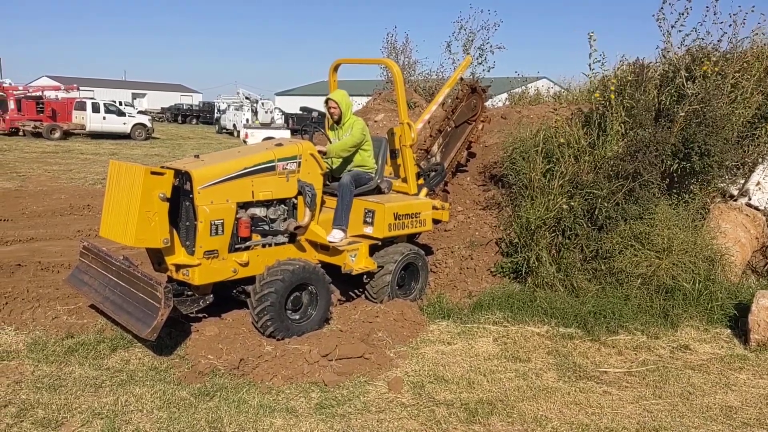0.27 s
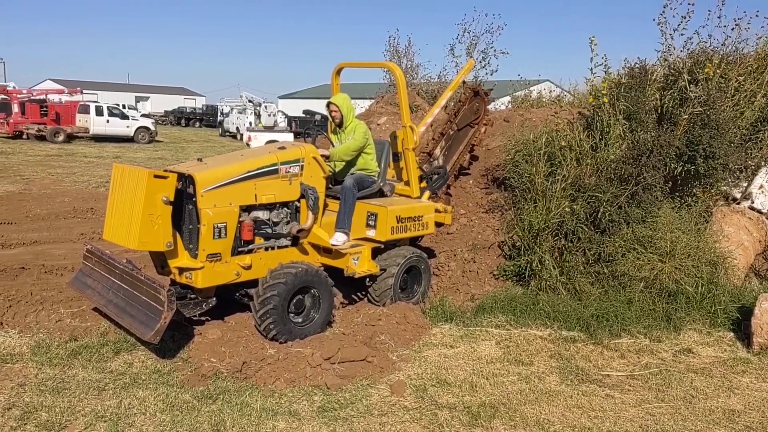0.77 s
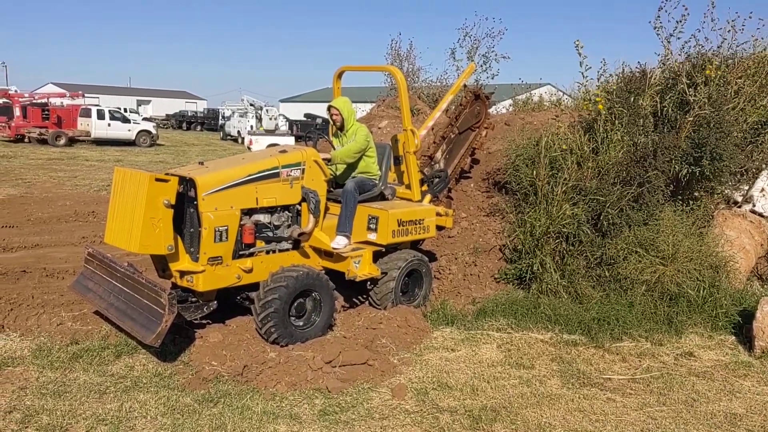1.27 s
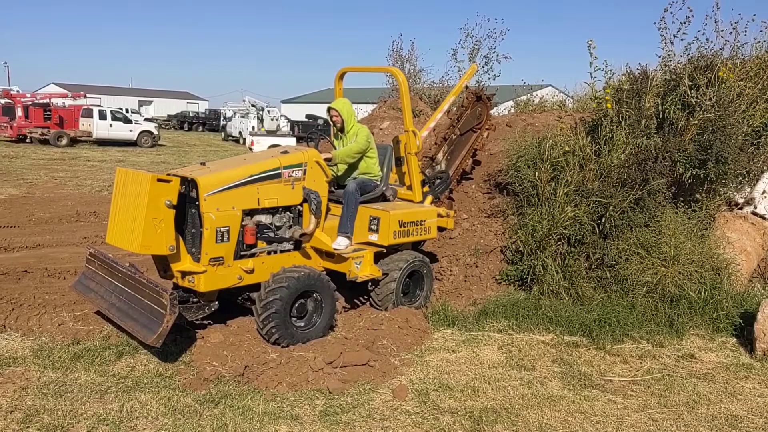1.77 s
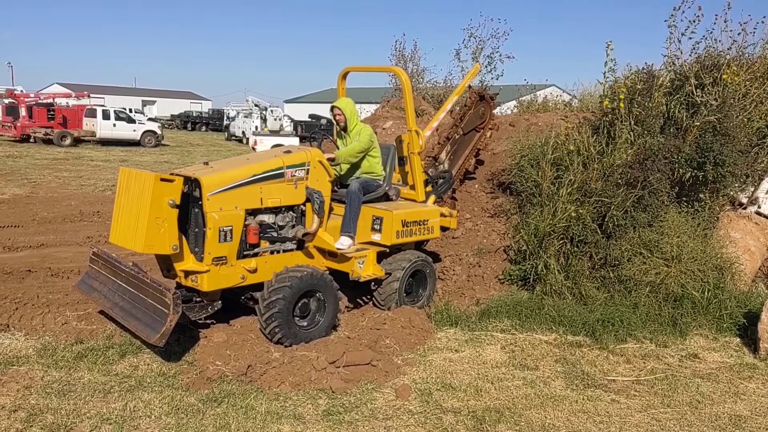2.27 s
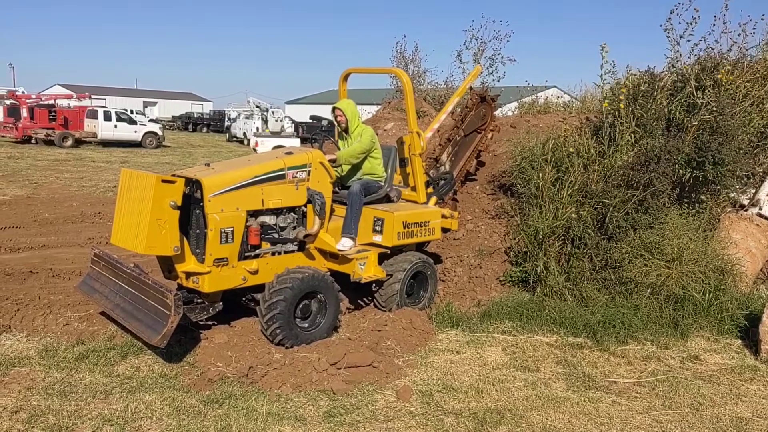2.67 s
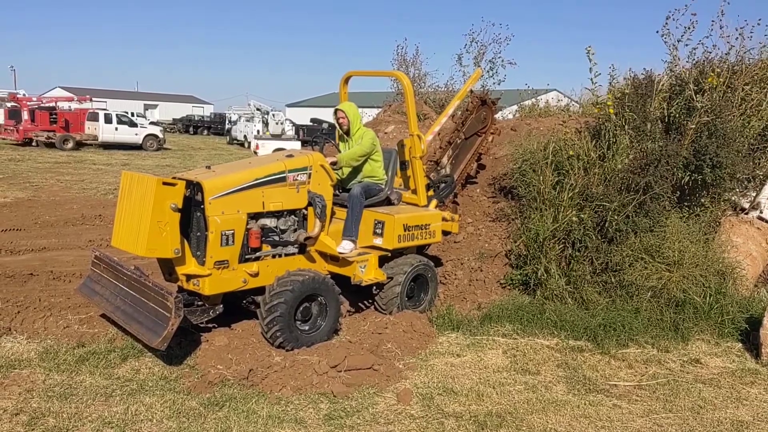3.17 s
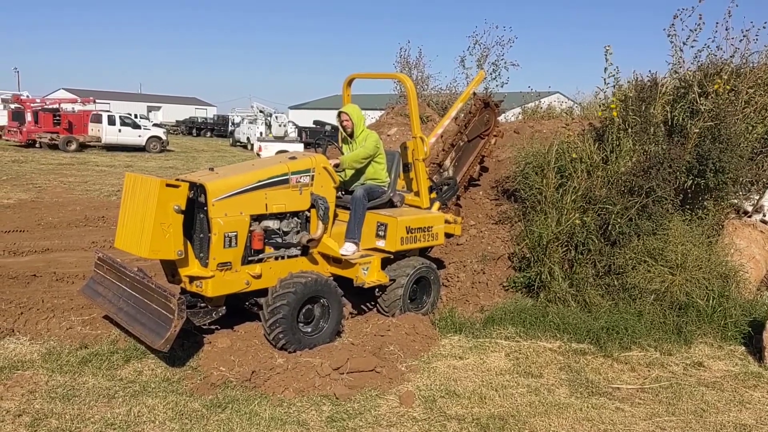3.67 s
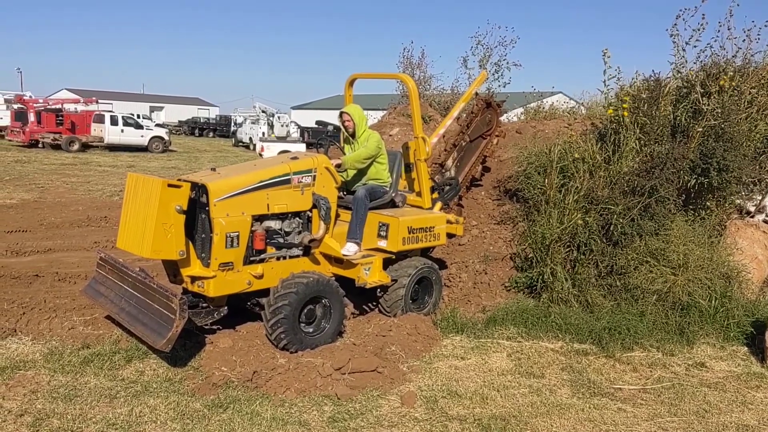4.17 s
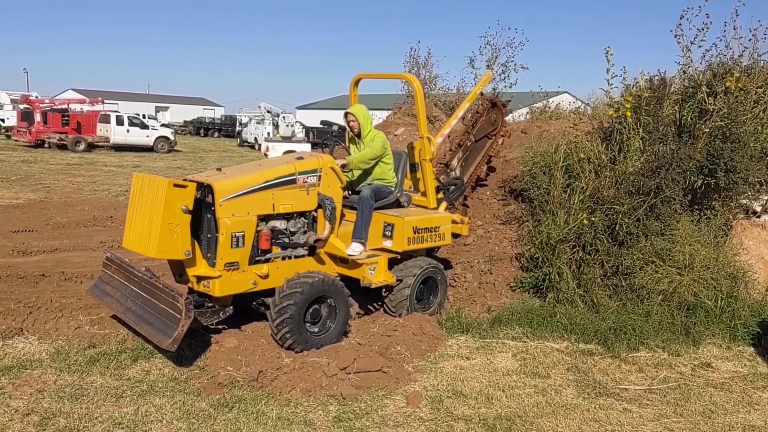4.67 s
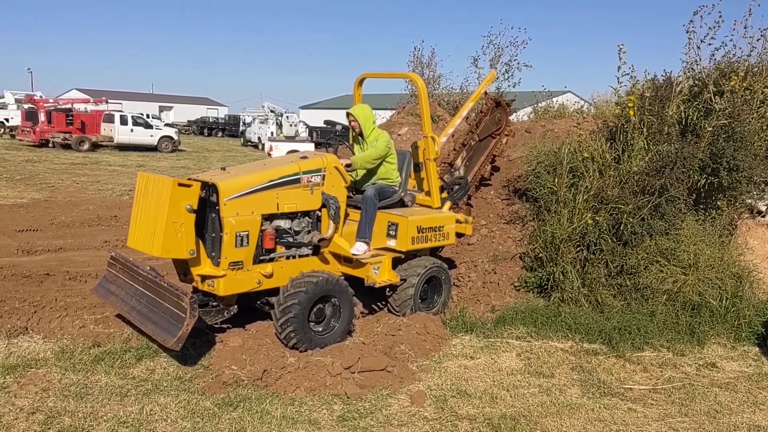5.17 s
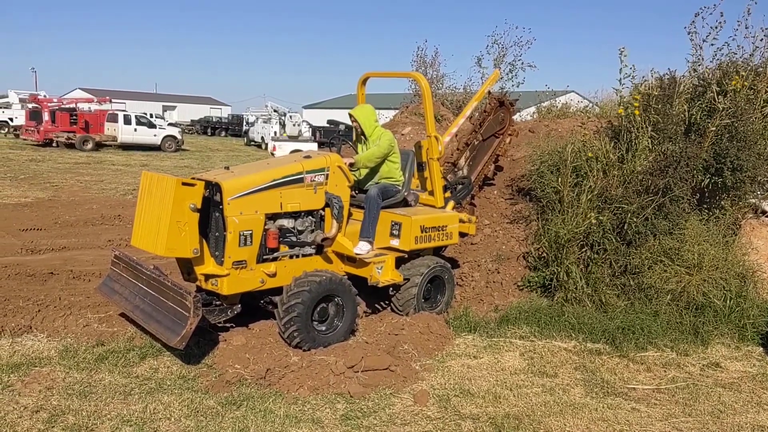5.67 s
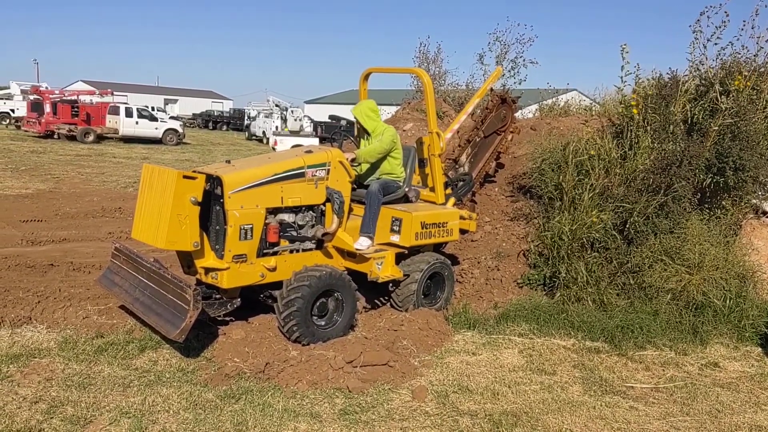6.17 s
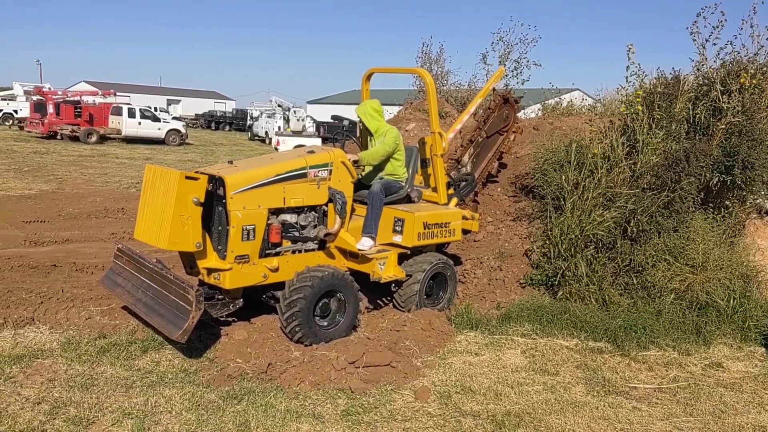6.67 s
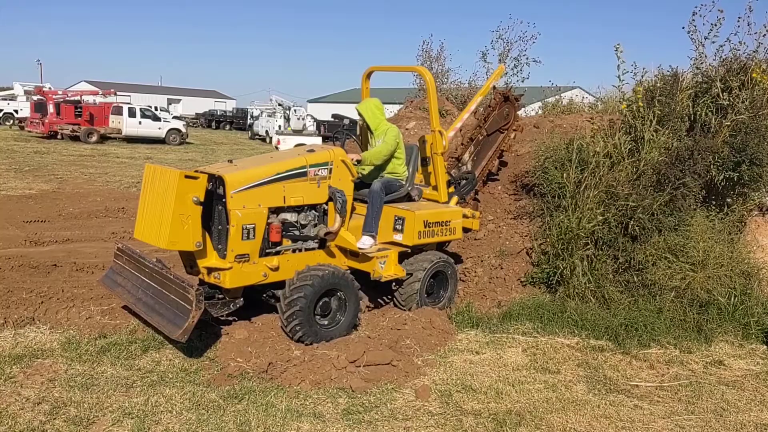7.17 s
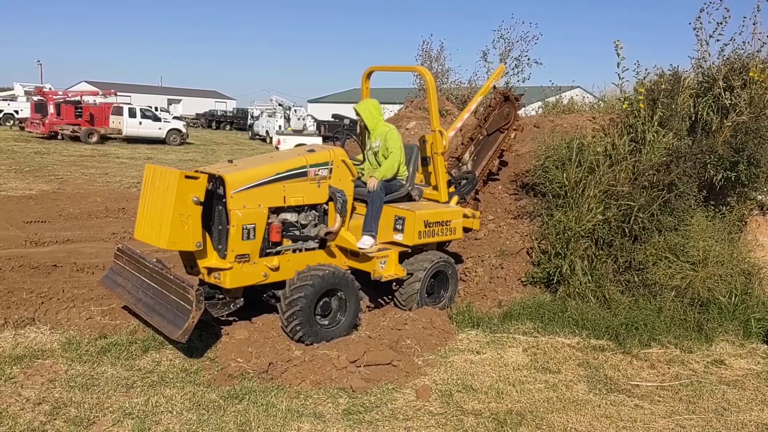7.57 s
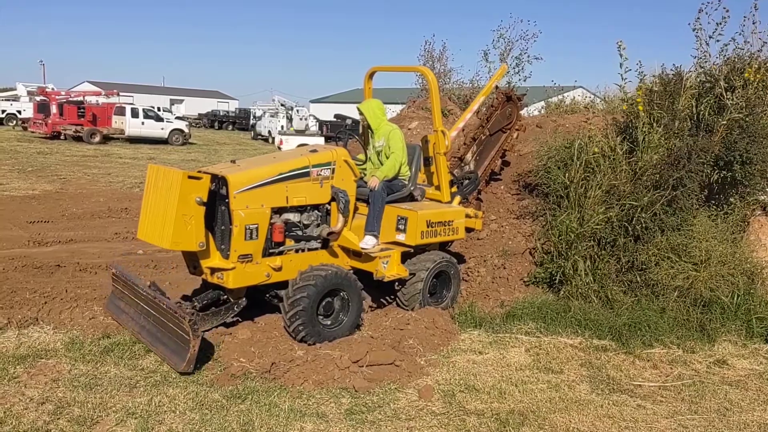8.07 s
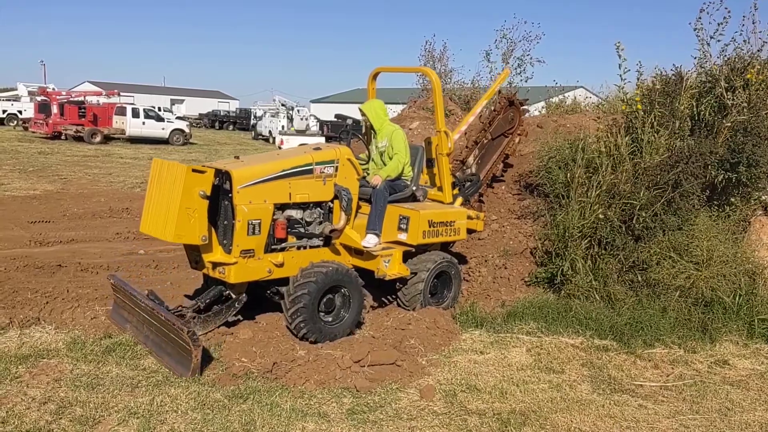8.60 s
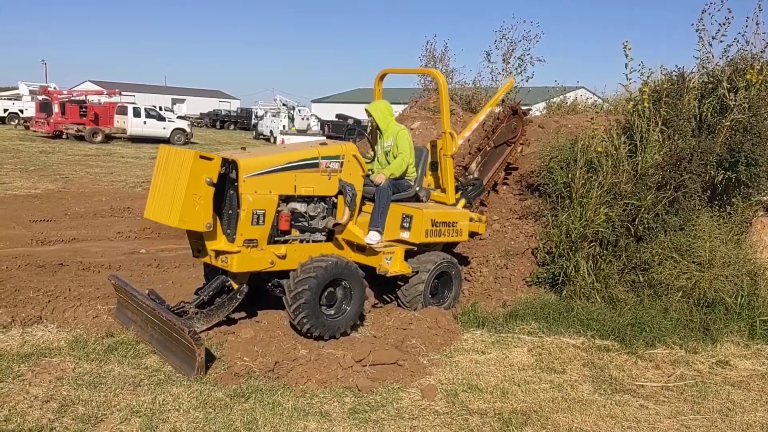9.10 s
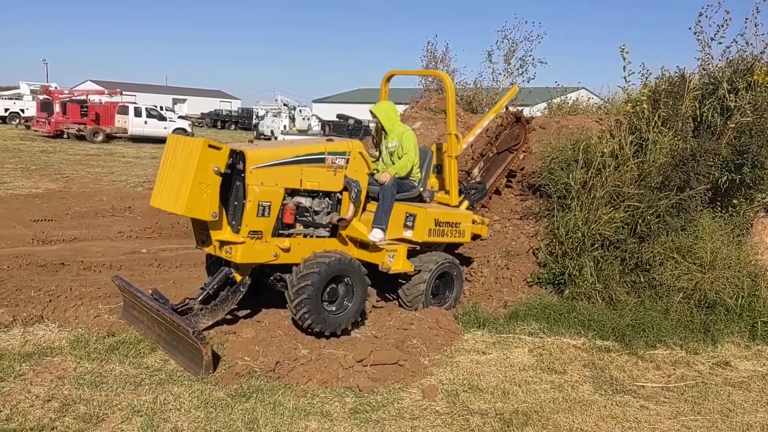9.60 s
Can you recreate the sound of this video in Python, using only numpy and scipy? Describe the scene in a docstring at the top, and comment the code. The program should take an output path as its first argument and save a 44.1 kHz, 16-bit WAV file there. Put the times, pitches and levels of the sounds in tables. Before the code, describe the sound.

In an open field, a ride-on diesel machine several metres away idles slowly with soft, uneven knocks and metallic ticking. From about two seconds it is throttled up, the drone rising and growing much louder. It levels off near seven seconds into a dense clattering roar with gear and pump whine. Low wind gusts buffet the left side of a handheld stereo microphone, and oil hisses near the end.

```python
"""A four-cylinder diesel on a ride-on trencher in a field idles, then is throttled up to full speed.
Its block knocks and clatters: noise shaped by blows that keep step with the crank. Sine tones locked
to the crank make the exhaust drone and the gear and pump whine. Filtered noise makes the rushing air
and hissing oil. Gusts of wind buffet the left microphone port; two short puffs pop on the right one."""
import sys
import numpy as np
from scipy import signal
from scipy.fft import rfft, irfft
from scipy.io import wavfile
from scipy.ndimage import uniform_filter1d

SR = 44100
rng = np.random.default_rng(int(sys.argv[2]) if len(sys.argv) > 2 else 0)


def put_to_file(sound):
    """Save the sound as 16-bit audio at rate SR, in the file named by the first command-line argument."""
    columns = np.atleast_2d(sound).T  # one column per channel
    safe = np.clip(columns, -1, 1)
    whole_steps = np.round(safe * 32767)
    wavfile.write(sys.argv[1], SR, whole_steps.astype(np.int16))


N = 433944
TIME = np.arange(N) / SR
FREQ = np.fft.rfftfreq(N, 1 / SR)

TOP_SPEED_HZ = 41.03  # crankshaft turns per second
# for a short while the speed overshoots
OVERSHOOT_S, OVERSHOOT_LENGTH_S = 7.58, 0.57


def gain_of(db):
    """Turns decibels into an amplitude factor."""
    return 10 ** (np.asarray(db) / 20)


def evened(x):
    """Scales a signal to an rms (average strength) of one."""
    return x / np.sqrt(np.mean(x ** 2) + 1e-20)


def curve(rows):
    """Reads a table over time, with straight lines between rows, at every sample."""
    return np.interp(TIME, *np.transpose(rows))


def read(points):
    """Reads a table over frequency, on a logarithmic pitch scale, at every frequency bin."""
    hz, value = np.transpose(points)
    return np.interp(np.log(FREQ + 1), np.log(hz + 1), value)


def band(low_hz, high_hz):
    """Steep band-pass gain; neighbouring bands add up in power."""
    lower_edge = 1 + (low_hz / (FREQ + 1)) ** 16
    upper_edge = 1 + (FREQ / high_hz) ** 16
    return (lower_edge * upper_edge) ** -.5


def noise(gain):
    """Noise of rms one with the given gain over frequency."""
    return evened(irfft(rfft(rng.standard_normal(N)) * gain, N))


def wander(rate_hz):
    """Slow random drift of rms one: straight lines between random points."""
    knots = rng.standard_normal(4096)
    return evened(np.interp(TIME * rate_hz, np.arange(len(knots)), knots))


def step(x, middle, spread):
    """An S-curve from zero to one."""
    return .5 + .5 * np.tanh((x - middle) / spread / 2)


def bell(s, length):
    """A swell of height one that stays above one half for the given length."""
    return np.exp(-np.minimum(np.log(2) * (2 * (TIME - s) / length) ** 2, 50))


def pulsing(cycles, speed_hz, decay_s):
    """Envelope that jumps at each whole cycle and dies away to a low remainder."""
    since_jump_s = (cycles % 1) / speed_hz
    return evened(.12 + np.exp(-since_jump_s / decay_s))


def tone(turns, level_db, flutter_db, sway):
    """A sine locked to the crank that wavers a little in level and phase (sway in radians)."""
    level = np.sqrt(2) * gain_of(level_db + flutter_db * wander(9))
    return level * np.sin(2 * np.pi * (turns + rng.random()) + sway * wander(14))


def strain():
    """Near one while the idling engine strains at first, zero after the strain lets go."""
    ends_s, release_s = 0.55, 0.43
    return 1 - step(TIME, ends_s, release_s)


def eased():
    """Zero while the engine pulls, then towards one as its load eases off at speed."""
    start_s, ease_time_s = 7, 1.0
    return 1 - np.exp(-np.maximum(TIME - start_s, 0) / ease_time_s)


def loudness(law, speed, gusts):
    """Level in dB of one kind of engine noise, from speed, load and wind."""
    idle_db, rise_db, middle, spread, strain_db, overshoot_db, blade_db, sag_db = law
    blade_s, blade_rise_s = 9.17, 0.015  # the blade meets the ground and takes weight
    load_db = strain_db * strain()
    load_db = load_db + overshoot_db * bell(OVERSHOOT_S, OVERSHOOT_LENGTH_S)
    load_db = load_db + blade_db * step(TIME, blade_s, blade_rise_s)
    return idle_db + rise_db * step(speed, middle, spread) + load_db - sag_db * np.sqrt(gusts / gusts.max())


def throb_depth():
    """Depth in dB of the throb once a cycle (two turns), deepest while the speed overshoots."""
    return 0.55 + 1.5 * bell(OVERSHOOT_S, OVERSHOOT_LENGTH_S)


def unsteadiness(waver_db=1.0):
    """Gain of the metal and air noise: it wavers a little and dips briefly."""
    # brief dips in level: start_s (middle of the dip), depth_db, length_s
    dips = [(4.949, 6, 0.012), (7.124, 8, 0.03)]
    dip_db = sum(db * bell(s, length) for s, db, length in dips)
    return gain_of(waver_db * wander(8) - dip_db)


def repeating(turns, speed, count=700, size=32768):
    """A dense rattle that is the same in every cycle, as strong per Hz as unit noise."""
    cycle = evened(irfft(np.r_[0, np.exp(2j * np.pi * rng.random(count))], size))
    rattle = np.interp(turns / 2 % 1 * size, np.arange(size), cycle)
    return rattle * np.sqrt(count * speed / SR)


def shaking(turns, speed):
    """The dense rattle at each port, part cyclic and part random; it repeats more exactly later on."""
    # share of sound that each port gets by its own paths: pitch_hz, share (0 to 1)
    scatter_points = [(60, 0.16), (600, 0), (2000, 0.16), (4000, 0.24), (8000, 1), (15000, 0.6)]
    steady = np.interp(TIME, [0, 2, 6.5, 8, 9.3], [0.1, .1, 0.19, 0.59, 0.69]).clip(0, 1)
    # combustion is the least regular part
    locked = np.clip(band(20, 4860) * (1 - 0.43 * band(1750, 2470)), 0, 1)
    paths = []
    for _ in range(3):  # the direct sound, and what is scattered into each port
        cyclic = np.sqrt(steady) * repeating(turns, speed) + np.sqrt(1 - steady) * rng.standard_normal(N)
        irregular = rfft(rng.standard_normal(N)) * np.sqrt(1 - locked ** 2)
        paths.append(rfft(cyclic) * locked + irregular)
    scatter = read(scatter_points).clip(0, 1)
    return irfft(np.sqrt(1 - scatter) * paths[0] + np.sqrt(scatter) * np.array(paths[1:]), N)


def blows(turns, axis, decay_s, uneven_db, between):
    """Envelope of the blows of each cycle: each is of slightly random size and dies quickly."""
    # blows in a cycle of two turns: crank_position_turns, knock_db, tick_db (relative levels)
    blow_rows = [(0.021, 5, 9.5), (0.131, 4, 12.5), (.32, -14, -15), (0.519, 2, 19), (.68, 2.5, -1),
                 (0.851, -0.5, -1), (1.0, 2.5, 14.5), (1.13, 2, 19.5), (1.32, -4, -14), (1.511, 4.5, 17),
                 (1.67, -1, -12), (1.86, -25, 7)]
    hits = np.zeros(N)
    for row in blow_rows:
        at = np.flatnonzero(np.diff(np.floor((turns - row[0]) / 2)))
        chance = rng.uniform(-1.2, 1.2, 256)[:len(at)]
        hits[at] += gain_of(row[axis] + uneven_db * chance) ** 2
    power = signal.lfilter([1], [1, -np.exp(-1 / (decay_s * SR))], hits)
    power /= uniform_filter1d(power, size=12000) + 1e-9  # keeps only the shape, not the level
    return np.sqrt((power + between) / (1 + between))  # "between" fills the gaps with steady power


def engine_colours():
    """Gain over frequency at idle, while pulling and at full speed: a base curve plus resonances."""
    # colour of the engine noise at idle: pitch_hz, level_db (per Hz, relative)
    idle_points = [(30, -19), (70, -2), (130, -6), (260, -7.5), (400, -1.5), (620, -8), (1000, -10.5),
                   (1650, -4.5), (2400, 2), (3200, -8), (4200, -15.5), (6500, -20), (10000, -27),
                   (15800, -39)]
    # colour of the engine noise at full speed: pitch_hz, level_db (per Hz, relative)
    full_points = [(30, -46), (70, -18), (150, -24), (370, -11), (620, -18.5), (1150, -15.5), (1700, -6),
                   (2200, -1), (3200, -10), (4600, -14.5), (7300, -20), (10000, -28.5), (14000, -33.5),
                   (15800, -29)]
    # resonances of block and panels: pitch_hz, width_hz, idle_lift_db, pulling_lift_db, full_speed_lift_db
    panels = [(522, 36, 5, 6, 8.5), (831, 233, 10, 15.5, 10.5), (1060, 61, 6.5, 8, -1),
              (1218, 85, 10.5, 1, -1.5), (1560, 140, 7.5, 4, 4.5), (1905, 193, 15, 10, 5),
              (2620, 540, 1, 4.5, 0), (3300, 180, 0.5, 9.5, 0.5), (3820, 440, -2.5, 4, 3.5),
              (5450, 680, 8, -3, -1), (5780, 620, -5.5, 10.5, -2.5), (7070, 770, -5.5, 3.5, 1),
              (8400, 880, 0, 4, -2.5), (9940, 670, -4.5, -3, 5), (11600, 300, -4.5, -5, -0.5),
              (14500, 460, 2, 4, -7), (15300, 720, -2.5, 19, 1)]
    idle, full = read(idle_points), read(full_points)
    colours = []
    for k, base in enumerate([idle, (idle + full) / 2, full]):
        lift_db = sum(lifts[k] / (1 + (2 * (FREQ - hz) / width) ** 2) for hz, width, *lifts in panels)
        colours.append(gain_of(base + lift_db))
    return colours


def clatter(turns, speed, levels_db):
    """Blows shake the block and its panels, whose colour changes from idle through the pull to full speed."""
    drive = shaking(turns, speed)
    stage = np.interp(speed, [15.0, 27.0, 31.2, 41.6], [0, 0.63, 1, 2])
    shares = [np.clip(1 - abs(stage - k), 0, 1) for k in range(3)]
    casing, knock, ticks = gain_of(levels_db)
    throb = gain_of(throb_depth() * np.cos(np.pi * turns))
    hard = hard_bursts(turns, decay_s=0.0097)

    casing = casing * blows(turns, axis=1, decay_s=0.0049, uneven_db=5.0, between=5.6)
    knock = knock * throb * blows(turns, axis=1, decay_s=0.004, uneven_db=5.0, between=1.0)
    tapping = ticks * gain_of(2.2) * blows(turns, axis=2, decay_s=.003, uneven_db=1, between=1.3)
    snapping = ticks * gain_of(0.5) * blows(turns, axis=2, decay_s=0.0025, uneven_db=4.0, between=1.0)
    # each part: (envelope, band it fills, band that sets its level)
    parts = [(np.hypot(casing, gain_of(-17.0) * hard), band(18, 1475), band(630, 1470)),
             (np.hypot(knock, gain_of(-6) * hard), band(1780, 3300), band(1150, 3700)),
             (np.hypot(tapping, gain_of(-27) * hard), band(3340, 9020), band(3430, 12000)),
             (snapping, band(9750, 20000), band(3230, 12000))]
    struck = [(rfft(drive * envelope) * fills, measure) for envelope, fills, measure in parts]

    rattle = 0
    for colour, share in zip(engine_colours(), shares):
        mix = sum(part / np.sqrt(np.mean((colour * measure) ** 2)) for part, measure in struck)
        rattle = rattle + share * irfft(colour * mix, N)
    return rattle + burst_ring(hard)


def ticking(turns, speed, offset=.235):
    """Small steel parts of the valve and fuel gear tick sharply and ring in the top treble."""
    # what the ticks ring with: pitch_hz, width_hz, level_db (relative)
    tick_modes = [(8960, 460, 0.5), (11500, 350, -6), (14100, 530, -2), (15500, 350, -5)]
    # loudest at middling speed (turns/s), and 10 dB weaker this far to either side
    loudest_db, middle_hz, spread_hz = -50, 26, 10.6
    per_turn = 3
    beat = pulsing(per_turn * (turns - offset), per_turn * speed, decay_s=0.0033)
    strikes = rfft(rng.standard_normal(N) * beat)
    modes = sum(gain_of(db) / (1 + 2j * (FREQ - hz) / width) for hz, width, db in tick_modes)
    level_db = loudest_db - 10 * ((speed - middle_hz) / spread_hz) ** 2
    return evened(irfft(strikes * modes * band(7100, 20000), N)) * gain_of(level_db)


def exhaust(turns, speed):
    """Tones at multiples of the crank speed; their mix shifts with load, and the silencer booms in the pull."""
    # exhaust drone and running tones: crank_order (waves per turn), idle_db, pulling_db, full_speed_db
    drone_rows = [(2, -63, -34.5, -42), (3, -70, -37.5, -47), (5, -60, -42.5, -37.5), (6, -46, -32.5, -74),
                  (7, -52.5, -40.5, -64), (8, -48.5, -30.5, -33), (9, -56, -52.5, -29.5),
                  (10, -61.5, -54, -33), (11, -63, -35.5, -43), (12, -54, -55, -37.5), (24, -72, -38, -60)]
    # engine state: start_s, state (0 idle, 1 pulling up to speed, 2 running free at full speed)
    state_rows = [(0, 0), (2.9, 0.024), (4.5, 0.78), (5.6, 1.05), (6.7, 0.82), (7.15, 2.04), (8, 1.77),
                  (9.84, 1.82)]
    state = curve(state_rows)
    idling = np.clip(1 - state, 0, 1)
    load_db = 5 * strain() - 3 * idling  # harder under the early strain, slacker at idle
    running_flutter_db, idle_flutter_db = 1.5, 2.6
    flutter_db = running_flutter_db + (idle_flutter_db - running_flutter_db) * idling
    drone = 0
    for order, *levels in drone_rows:
        level_db = np.interp(state, np.arange(3), levels) + load_db
        drone = drone + tone(round(order) * turns, level_db, flutter_db, sway=0.084)

    # the silencer booms when the fourth order passes its resonance, less so once the load eases
    boom_order, resonance_hz, width_hz = 4, 142.2, 25.5
    boom_db, db_per_octave, eased_db = -22.5, 12.5, -12.5
    hz = boom_order * speed
    tuning_db = db_per_octave * np.log2(hz / resonance_hz)
    tuning_db = tuning_db - 10 * np.log10(1 + (2 * (hz - resonance_hz) / width_hz) ** 2)
    level_db = boom_db + tuning_db + eased_db * eased()
    return drone + tone(boom_order * turns, level_db, flutter_db=1.0, sway=0.081)


def gust_power():
    """Power of all the gusts together, each a smooth swell."""
    # gusts on the left port: start_s (middle of the gust), level_db, length_s
    gust_rows = [(2.95, -34, 0.04), (3.345, -34, 0.035), (3.799, -23.5, 0.046), (4.133, -10, 0.032),
                 (4.297, -6.5, 0.026), (4.412, -12.5, 0.074), (4.595, -14, 0.036), (4.92, -10, 0.052),
                 (5.05, -15.5, 0.051), (5.228, -17.5, 0.026), (6.295, -15.5, 0.064), (6.604, -15, 0.13),
                 (6.777, -10.5, 0.036), (7.06, -11, 0.14), (7.36, -11.5, 0.044), (8.057, -13.5, 0.29),
                 (8.588, -15.5, 0.057), (8.92, -12.5, 0.15), (9.42, -19, 0.15), (9.542, -18, 0.03)]
    return sum(gain_of(db) ** 2 * bell(s, length) for s, db, length in gust_rows)


def wind(gusts, ceiling=0.9):
    """Fluttering turbulence at the left port swells with each gust; the right port is sheltered."""
    # breeze between the gusts: start_s, level_db
    breeze = [(0, -49), (1.1, -64), (1.35, -44), (2.5, -61), (3.5, -41), (4.3, -22), (5.6, -30), (7, -20.5),
              (9.84, -39)]
    # colour of the buffeting: pitch_hz, level_db (per Hz, relative)
    buffet = [(15, -33), (30, -28), (50, -26.5), (80, -7), (170, -0.5), (250, -3), (350, -7), (500, -12),
              (700, -23.5), (1400, -37), (4000, -68)]
    power = gain_of(curve(breeze)) ** 2 + gusts
    push = np.sqrt(power) * evened(gain_of(2.2 * wander(70)))
    colour = gain_of(read(buffet))
    pressure = push * np.array([noise(colour), gain_of(-16) * noise(colour)])
    return ceiling * np.tanh(pressure / ceiling)  # the strongest gusts overload and flatten softly


def hard_bursts(turns, decay_s, uneven_db=-2.0):
    """Amplitude envelope of one hard blow a turn during spells, and of a few single bursts of loudness."""
    # spells of one hard blow a turn: start_s (middle), length_s, crank_position_turns, level_db (before mixing)
    spells = [(0.82, 0.8, 0.53, -23.5), (2.6, 1.2, 0.15, -29.5)]
    # single bursts of loudness, the last as the level returns after a dip: start_s, level_db (before mixing)
    bursts = [(0.9694, -28), (1.5549, -31), (2.9587, -33), (3.0041, -29), (3.276, -22), (3.8028, -19),
              (4.043, -15.5), (4.9585, -11)]
    hits = np.zeros(N)
    for s, length, position, db in spells:
        at = np.flatnonzero(np.diff(np.floor(turns - position)))
        chance = rng.standard_normal(size=512)[:len(at)]
        hits[at] += bell(s, length)[at] * gain_of(db + uneven_db * chance)
    for s, db in bursts:
        hits[round(s * SR)] += gain_of(db)
    return signal.lfilter([1], [1, -np.exp(-1 / (decay_s * SR))], hits)


def burst_ring(hard, hz=1930, level_db=-8.5):
    """The narrow note of the block, a sine that sounds with each hard blow or burst."""
    return hard * gain_of(level_db) * np.sin(2 * np.pi * hz * TIME)


def puffs():
    """Single eddies pop on the right port: very short bursts of a sine."""
    # puffs: start_s (middle), level_db (height of the envelope), pitch_hz, length_s (middle to 37 % height)
    puff_rows = [(2.235, -27, 430, .0018), (5.8565, -3, 240, 0.0018)]
    pop = np.zeros(N)
    for s, db, hz, length in puff_rows:
        envelope = np.exp(-np.minimum(((TIME - s) / length) ** 2, 50))
        pop += gain_of(db) * envelope * np.sin(2 * np.pi * hz * (TIME - s))
    return np.array([np.zeros(N), pop])


def ring(turns, speed, combustion_db, width_hz=75, droop_hz=110, offset=.22):
    """A resonance struck by each firing; at speed the blows merge, and it swells and droops once a cycle."""
    # ringing, sliding note in the clatter: start_s, pitch_hz (middle of the droop)
    ring_rows = [(3.2, 2188), (3.86, 2287), (4.55, 2212), (6.01, 2166), (8.41, 2189), (9.84, 2330)]
    # levels against the combustion noise; it sets in around this speed (turns/s)
    idle_db, full_db, db_per_octave, onset_hz, spread_hz = -42, -9, -14.5, 19.8, 1
    narrow = 1 / (1 + (FREQ / width_hz) ** 2)
    hum = noise(narrow) + 1j * noise(narrow)
    depth_db = throb_depth()
    # droop_hz is the fall over one cycle for each dB of throb
    hz = curve(ring_rows) - droop_hz * depth_db * ((turns / 2 + .5) % 1 - .5)
    running_db = full_db + db_per_octave * np.log2(speed / TOP_SPEED_HZ)
    share_db = idle_db + (running_db - idle_db) * step(speed, onset_hz, spread_hz)
    level_db = combustion_db + share_db + 2 * depth_db * np.cos(np.pi * turns)
    merged = np.clip((speed - 27) / 14, 0, 1)
    struck = merged + (1 - merged) * pulsing(2 * (turns - offset), 2 * speed, decay_s=0.0026)
    note = (hum * np.exp(2j * np.pi * np.cumsum(hz) / SR)).real  # moves the hum up to the note's pitch
    return note * struck * gain_of(level_db)


def buzz(turns, speed, combustion_db, offset=0.12):
    """Each firing shakes the loose panels, each of which answers only near its own speed."""
    # loose panels: speed_turns_per_s, spread_turns_per_s, pitch_hz, width_hz, level_db (against combustion)
    loose_panels = [(25, 4, 2680, 330, -6), (36.1, 2.5, 3230, 380, -6.5)]
    shaken = pulsing(2 * (turns - offset), 2 * speed, decay_s=0.007) * gain_of(combustion_db)
    answer = 0
    for middle, spread, hz, width, db in loose_panels:
        panel = noise(1 / (1 + (2 * (FREQ - hz) / width) ** 2))
        answer = answer + panel * gain_of(db) * np.exp(-((speed - middle) / spread) ** 2)
    return shaken * answer


def air_rush(turns, speed):
    """Thin hiss that spits with every firing and surges once while the engine gathers speed."""
    idle_db, full_db, middle_hz, spread_hz = -85, -50, 24.2, 2.9  # speeds in turns/s
    surge_s, surge_db, fall_db_per_s = 4.05, -31.5, 65
    spit = pulsing(2 * turns, 2 * speed, decay_s=0.0087)
    steady = gain_of(idle_db + (full_db - idle_db) * step(speed, middle_hz, spread_hz))
    surge = gain_of(surge_db - fall_db_per_s * abs(TIME - surge_s))
    hiss = np.array([noise(band(4100, 16000)) for _ in range(2)])
    return hiss * spit * np.hypot(steady, surge)


def whine(turns, speed):
    """Gear and pump tones that rise with the shaft, grow with speed and stand out as the load eases."""
    # gear and pump tones at full speed, with the load eased: pitch_hz, level_db
    whine_rows = [(802.1, -42.5), (985.1, -37), (1044, -38), (1109, -40), (1314, -41), (1437, -57),
                  (1480, -34.5), (1561, -34), (1825, -31.5), (1949, -30.5), (1992, -48), (2094, -52),
                  (2132, -32), (2256, -37.5), (2568, -32.5), (2649, -30.5), (2934, -35), (3036, -34),
                  (3451, -63), (3655, -41)]
    db_per_octave, loaded_db = 32, -3.5
    strength_db = db_per_octave * np.log2(speed / TOP_SPEED_HZ) + loaded_db * (1 - eased())
    return sum(tone(hz / TOP_SPEED_HZ * turns, db + strength_db, flutter_db=1.0, sway=0.27)
               for hz, db in whine_rows)


def hydraulics(turns, speed, hz=6900, width_hz=1100):
    """Oil squeezes through the blade valve and flutters with the pump."""
    # hiss of oil as the blade goes down and takes weight: start_s, level_db
    oil = [(0, -73), (7.6, -73), (8.6, -39), (9.05, -62), (9.2, -39.5), (9.84, -37)]
    flutter = pulsing(2 * turns, 2 * speed, decay_s=0.0027)
    hiss = noise(1 / (1 + (2 * (FREQ - hz) / width_hz) ** 4))
    return hiss * flutter * gain_of(curve(oil))


def reflections(count=14, spread_s=.006):
    """A few faint early echoes from the machine's own plates ripple the treble of one port."""
    taps = np.zeros(N)
    at = (rng.uniform(.08, 1, count) * spread_s * SR).astype(int)
    taps[at] = rng.choice([-1, 1], count) / np.sqrt(count)
    return 1 + gain_of(-10) * band(3020, 20000) * rfft(taps)


def ports(x):
    """The left port mostly hears the machine first; the two sides are coloured differently."""
    # balance of the ports: pitch_hz, level_db (left minus right)
    balance = [(60, 3), (200, 2), (400, 0.5), (800, 1), (1200, 2), (1800, -1), (2400, -6), (3300, -2.5),
               (4200, 4.5), (5500, 7), (7500, 0), (10000, 8), (15000, 10)]
    # how far the left port leads: pitch_hz, lead_radians
    port_phase = [(0, -1.5), (950, 0.8), (1210, 0.6), (1980, 0.65), (3620, 3), (5080, 4), (7060, 6),
                  (7840, 4.5), (8270, 8), (9040, 11.5), (10900, 9.5), (14100, 18), (15200, 17),
                  (16300, 18.6)]
    lean = gain_of(read(balance) / 2)
    left = lean * reflections()
    right = np.exp(-1j * read(port_phase)) / lean * reflections()
    return irfft(rfft(x) * np.array([left, right]), N)


def scene():
    """One crankshaft drives the whole machine; the wind acts at the microphone."""
    # crankshaft speed: start_s, speed_turns_per_s
    shaft = [(0.0, 15.023), (1.02, 14.997), (1.42, 15.544), (1.9, 15.685), (2.62, 19.097), (3.29, 23.013),
             (3.88, 26.773), (5.01, 34.194), (5.24, 34.283), (6.28, 39.787), (6.77, 39.963), (7.01, 41.37),
             (7.48, 41.818), (7.96, 40.896), (9.14, 41.026), (9.84, 41.072)]
    # Three kinds of engine noise, each growing with speed along an S-curve. All three list: idle_db, rise_db,
    # half_rise_speed_turns_per_s, spread_turns_per_s, then changes: early_strain_lift_db, overshoot_lift_db,
    # blade_load_lift_db, gust_sag_db.
    # shaking of the casing
    casing_law = (-44, 19, 29.5, 3.5, 8.5, 1.5, 2, 3.5)
    # knock of combustion
    combustion_law = (-42, 25.5, 29, 2.5, 10.5, 0.5, -0.3, 1.5)
    # ticks of the valves
    valve_law = (-52, 25.5, 27.5, 2.5, 1.5, 1, 1.5, 3.5)
    speed, gusts = curve(shaft), gust_power()
    turns = np.cumsum(speed) / SR
    levels_db = [loudness(law, speed, gusts) for law in (casing_law, combustion_law, valve_law)]
    combustion_db = levels_db[1]
    metal = clatter(turns, speed, levels_db) + ticking(turns, speed)
    metal = metal + ring(turns, speed, combustion_db) + buzz(turns, speed, combustion_db)
    machine = (metal + air_rush(turns, speed)) * unsteadiness()
    machine = machine + exhaust(turns, speed) + whine(turns, speed) + hydraulics(turns, speed)
    return ports(machine) + wind(gusts) + puffs()


def record(dry):
    """A soft start; peaks are rounded off near full scale; then a steep filter removes the top treble."""
    fade_in_s, edge_hz = 0.012, 15950
    fade = np.minimum(TIME / fade_in_s, 1) ** 2
    rounded = fade * dry / (1 + (dry / .95) ** 6) ** (1 / 6)
    low_pass = signal.firwin(511, edge_hz, window=("kaiser", 9), fs=SR)
    return signal.oaconvolve(rounded, low_pass[None], "same")


dry = scene()
out = record(dry)
put_to_file(out)
```